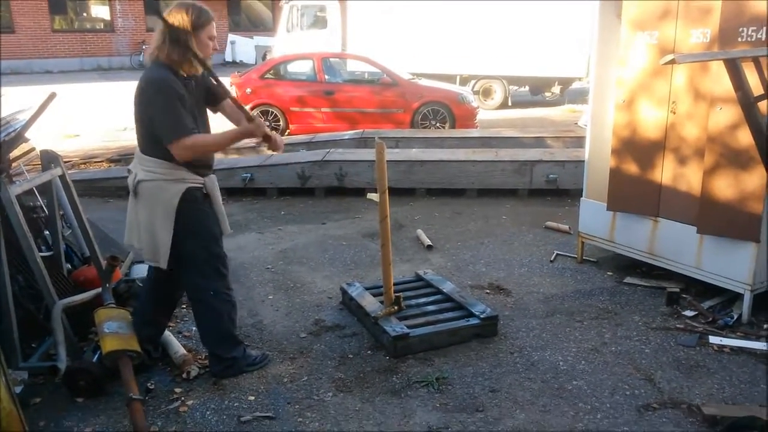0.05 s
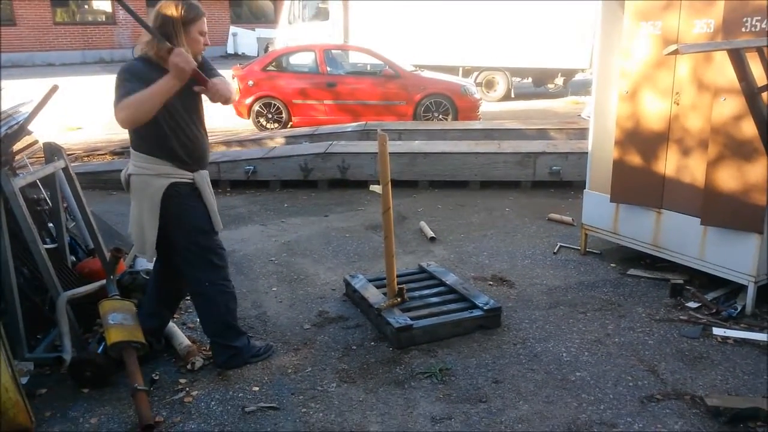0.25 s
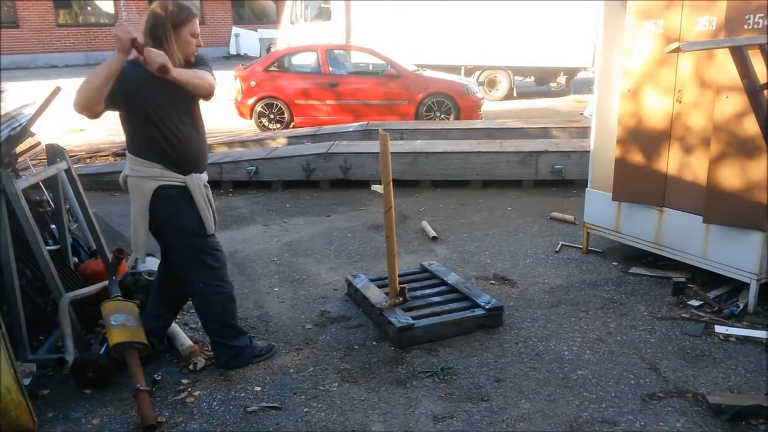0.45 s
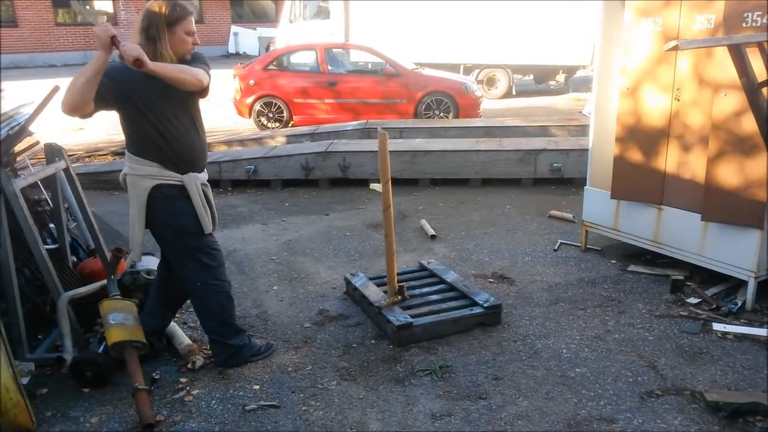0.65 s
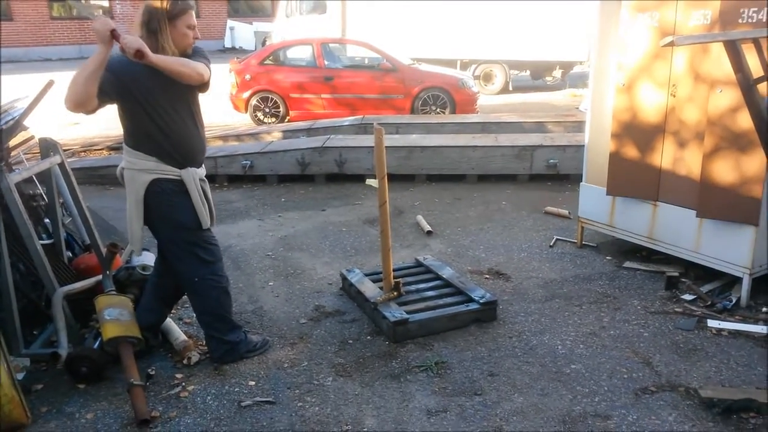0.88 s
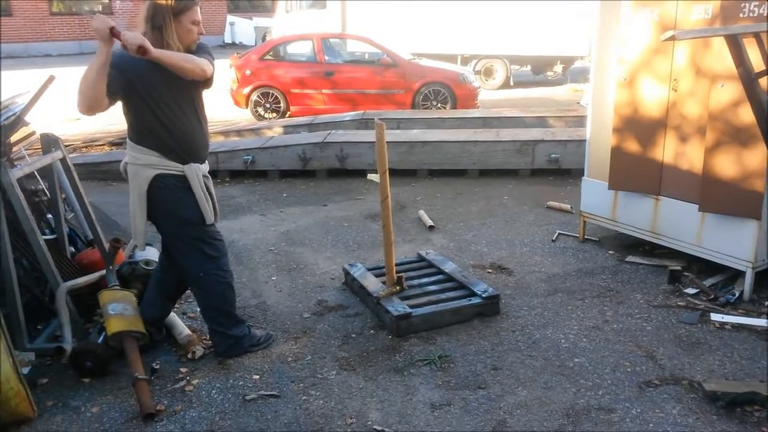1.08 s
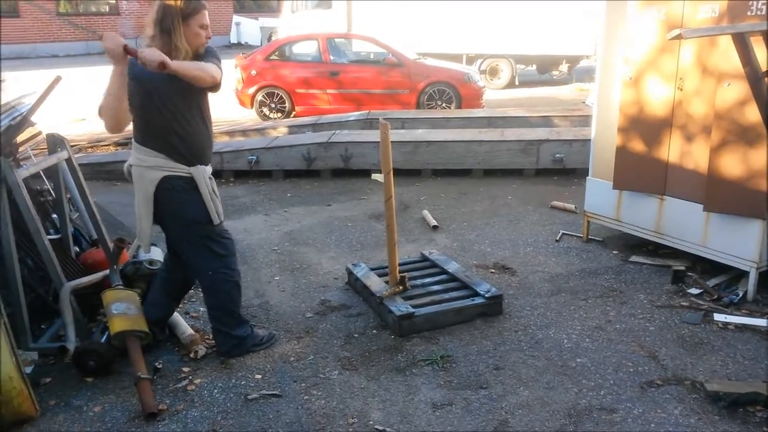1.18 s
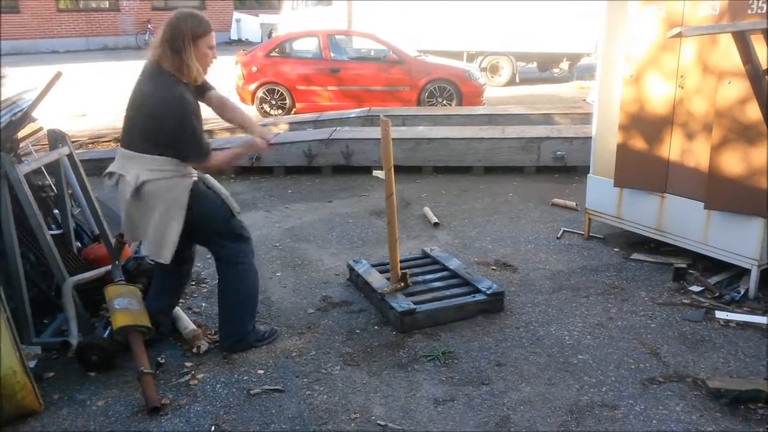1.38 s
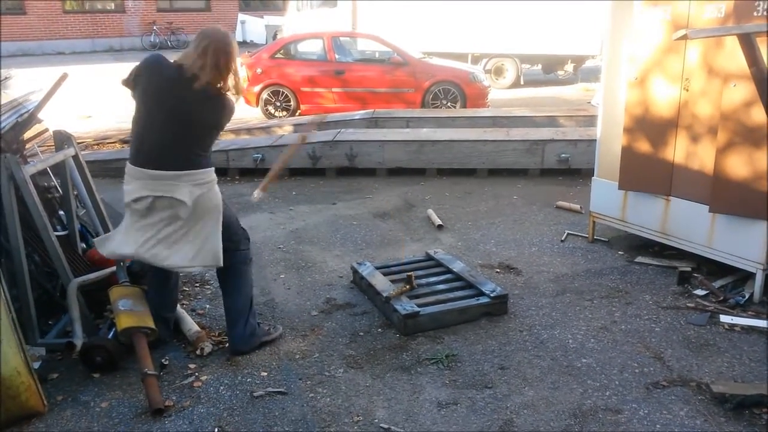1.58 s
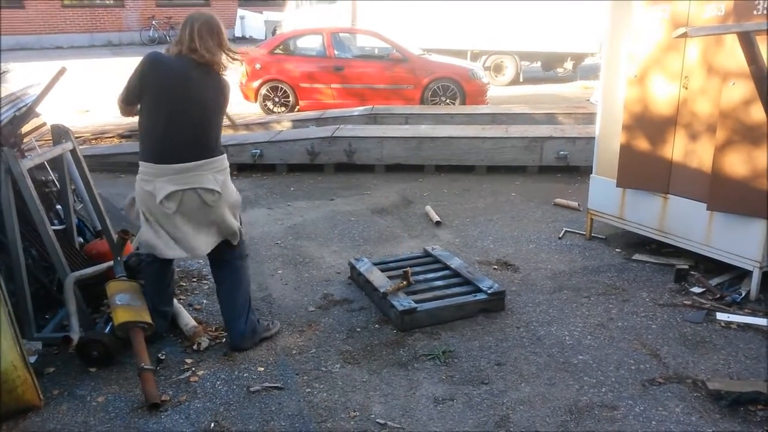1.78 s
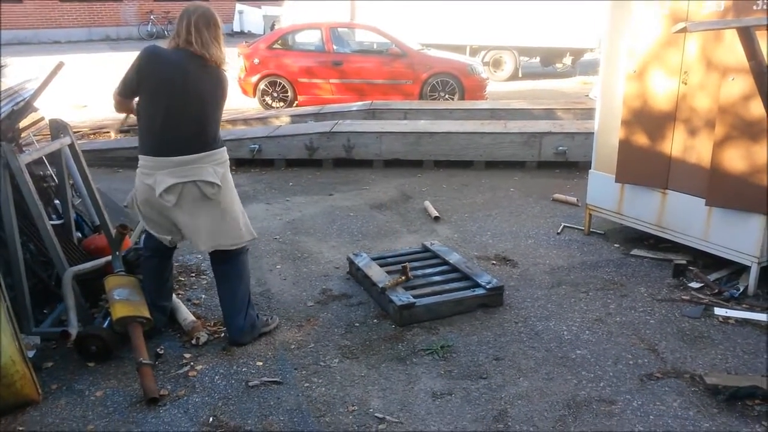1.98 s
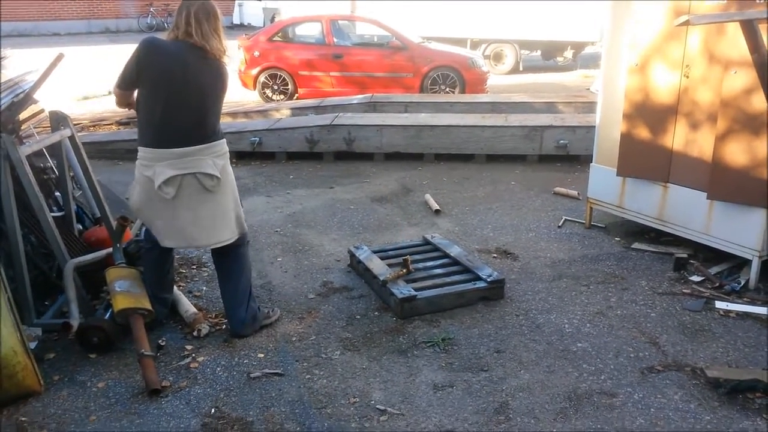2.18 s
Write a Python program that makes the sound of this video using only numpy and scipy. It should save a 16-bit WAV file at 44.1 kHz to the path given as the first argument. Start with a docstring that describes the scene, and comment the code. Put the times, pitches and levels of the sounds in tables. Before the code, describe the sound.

One loud crack of a blade chopping wood outdoors, followed by a light wooden clatter.

```python
"""A sword cuts through an upright wooden pole in a paved yard: the fibres burst in one crack,
the stump and its pallet ring, and a wall throws the crack back. Clothes rustle in the swing before it;
after it, chips tick down and the cut piece lands on grit. Under it all sit a faint electrical hum
and the wash of the town. The small microphone overloads, and its gain control ducks the yard
and recovers slowly."""
import sys
import numpy as np
from scipy import signal
from scipy.fft import rfft, irfft, next_fast_len
from scipy.io import wavfile
from scipy.ndimage import uniform_filter1d

SR = 44100
rng = np.random.default_rng(int(sys.argv[2]) if len(sys.argv) > 2 else 0)


def dump_mix(stems):
    """Bounce the given channels to the path in sys.argv[1] as a 16-bit WAV at rate SR."""
    frames = np.atleast_2d(stems).T  # one column per channel
    limited = np.clip(frames, -1, 1)  # hard clip at full scale
    pcm = np.round(limited * 32767).astype(np.int16)
    wavfile.write(sys.argv[1], SR, pcm)


N = 99048
T = np.arange(N) / SR
CUT_S = 1.6556   # the blade bites


def from_db(db):
    return 10 ** (np.asarray(db) / 20)


def unit_rms(x):
    return x / np.sqrt(np.mean(x ** 2) + 1e-20)


def fader(points):
    """Gain that rides through points of seconds and dB."""
    return from_db(np.interp(T, *np.transpose(points)))


def at_hz(points, hz):
    """Read a curve along a log frequency axis."""
    freqs, values = np.transpose(points)
    return np.interp(np.log(np.maximum(hz, 1)), np.log(freqs), values)


def drift(rate):
    """A smooth random wobble, with `rate` new values a second."""
    knots = rng.standard_normal(256)
    return np.interp(T * rate, np.arange(len(knots)), knots)


def colour(x, spectrum, keep_power=True):
    """Minimum-phase EQ, so nothing sounds ahead of an attack."""
    size = next_fast_len(N + SR // 10, real=True)
    gain = from_db(at_hz(spectrum, np.arange(size // 2 + 1) * SR / size))
    cepstrum = irfft(np.log(unit_rms(gain) if keep_power else gain), size)
    cepstrum[1:size // 2] *= 2
    cepstrum[size // 2 + 1:] = 0
    return irfft(rfft(x, size) * np.exp(rfft(cepstrum)), size)[..., :N]


def grains(per_s, spread_db):
    """Two streams of random clicks of uneven size, at unit rms."""
    sizes = from_db(spread_db * np.minimum(rng.exponential(1, (2, N)), 3))
    signs = rng.choice([-1, 1], (2, N))
    return unit_rms(sizes * signs * (rng.random((2, N)) < per_s / SR))


def burst(start, t60, hold=0):
    """Envelope with a hard attack, a hold and an even decay; times in seconds."""
    return (T >= start) * from_db(-60 * np.clip((T - start - hold) / t60, 0, 4))


def ring(start, hz, t60):
    """One struck mode: a dying sine."""
    return burst(start, t60) * np.sin(2 * np.pi * hz * (T - start))


# Stereo width. Each row: frequency in Hz, side level against mid in dB.
STEREO_WIDTH = [(60, -15), (170, -8.5), (300, -8), (700, -3), (1500, 2), (4000, -1.5), (12000, 2)]
def stereo(pair):
    """Two unrelated signals become left and right, alike in the bass and wide in the treble."""
    mid, side = pair[0], colour(pair[1], STEREO_WIDTH, keep_power=False)
    return np.array([mid + side, mid - side]) / np.sqrt(2)


# Hum partials, near multiples of the mains. Each row: frequency in Hz, rms level in dB.
HUM_PARTIALS = [(100, -59), (150, -57), (200, -55), (248, -77), (300, -52.5), (500, -83), (598, -66.5),
                (699, -57), (798, -61.5), (898, -63.5)]
def mains_hum():
    """An electrical hum: the partials wander together in pitch and waver separately in level."""
    pitch_wander, waver_db = 0.0034, 2.5
    clock = T + pitch_wander * np.cumsum(drift(3.77)) / SR
    hum = 0
    for hz, db in HUM_PARTIALS:
        peak = np.sqrt(2) * from_db(db + waver_db * drift(16))
        hum += peak * np.sin(2 * np.pi * (hz * clock + rng.random()))
    return hum


# Tone of the town. Each row: frequency in Hz, relative level in dB.
TOWN_EQ = [(25, -21), (60, 10), (110, 3.5), (250, 3), (450, -2.5), (800, -2.5), (1300, -10), (2000, -12.5),
           (3200, -21.5), (6000, -24), (10000, -33), (14000, -30.5)]
# Its fader ride. Each row: time in seconds, level in dB.
TOWN_FADER = [(0, -47), (.7, -46.5), (1.25, -48.5), (1.65, -48.5), (2.25, -49)]
def town_wash():
    """The town blurs into a low, nearly steady bed of noise."""
    return np.sqrt(2) * fader(TOWN_FADER) * colour(stereo(rng.standard_normal((2, N))), TOWN_EQ)


# Tone of the cloth. Each row: frequency in Hz, relative level in dB.
CLOTH_EQ = [(300, -3), (1500, -1), (3500, 1.5), (7000, -1), (10000, -5), (14000, -3.5)]
# The wind-up and the swing. Each row: time in seconds, level in dB.
CLOTH_FADER = [(0, -59), (.3, -55.5), (.6, -59.5), (.95, -63.5), (1.35, -60), (1.52, -50), (1.63, -49.5),
               (1.75, -74), (1.95, -76)]
# Cloth catches. Each row: start in seconds, level in dB.
CLOTH_SCUFFS = [(1.481, -52), (1.5244, -43), (1.5540, -51)]
def clothes_rustle():
    """Cloth rubs as the body winds up, and catches during the swing."""
    scuffs = sum(from_db(db) * burst(start, t60=0.027) for start, db in CLOTH_SCUFFS)
    rubbing = colour(stereo(grains(per_s=7000, spread_db=3.5)), CLOTH_EQ)
    return (fader(CLOTH_FADER) + scuffs) * rubbing


# Tone of the yard's reverb. Each row: frequency in Hz, gain in dB.
REVERB_EQ = [(100, -9), (200, -7), (320, -3), (700, 3), (1300, -5.5), (2500, -2), (5000, 12), (10000, -8.5),
             (14000, -7)]
# Its length. Each row: frequency in Hz, time to fall 60 dB in seconds.
REVERB_T60 = [(150, 0.41), (700, 0.26), (2500, 0.24), (10000, 0.25)]
def yard_reverb(x):
    """Scattered reflections build up and die band by band, over a faint far tail."""
    build_s, return_db = 0.0098, -4.5
    noise = stereo(rng.standard_normal((2, N)))
    far_tail = from_db(-20.5) * burst(0, t60=0.8)
    edges_hz = [20, 350, 1400, 5600, 18000]
    response = 0
    for low, high in zip(edges_hz, edges_hz[1:]):
        band = signal.sosfilt(signal.butter(2, [low, high], "band", fs=SR, output="sos"), noise)
        near_tail = burst(0, t60=at_hz(REVERB_T60, np.sqrt(low * high)))
        response += band * (near_tail + far_tail)
    response = unit_rms(response * (1 - np.exp(-T / build_s))) / np.sqrt(N)
    wet = signal.fftconvolve(x, response, axes=-1)[:, :N]
    return from_db(return_db) * colour(wet, REVERB_EQ, keep_power=False)


def wall_slap(x):
    """A wall throws back one echo, thin in the bass."""
    delay_s, low_cut_hz = 0.040, 900
    delayed = np.roll(x, int(delay_s * SR), axis=-1) + 1e-18
    low_cut = signal.butter(1, low_cut_hz, "high", fs=SR, output="sos")
    return from_db(-8) * signal.sosfilt(low_cut, delayed)


# Falling chips. Each row: start in seconds, level in dB.
CHIP_HITS = [(1.7900, -12.5), (1.827, -15), (1.8539, -15.5), (1.86, -19), (1.8779, -10), (1.8848, -18.5),
             (1.8927, -13.5)]
# Their tone. Each row: frequency in Hz, relative level in dB.
CHIP_EQ = [(300, -15), (1500, 0.5), (3000, -9), (5000, 4.5), (7000, -5), (13000, -22)]
def chips():
    """Chips tick down close by on the left, each with a faint rattle."""
    ticks = np.zeros((2, N))
    for start, db in CHIP_HITS:
        click = np.arange(N) == int(start * SR)
        rattle = from_db(-22.5) * burst(start, t60=0.021) * rng.standard_normal((2, N))
        ticks += from_db(db) * (click + rattle)
    pan_left = from_db([[3], [-3]])
    return colour(ticks, CHIP_EQ) * pan_left


# Dull thuds. Each row: start in seconds, puff level in dB, tone level in dB, pitch in Hz,
# tone's t60 in seconds.
THUD_HITS = [(1.7880, -23.5, -22, 175, 0.063), (2.0947, -28.5, -28, 198, 0.12),
             (2.1100, -46, -28.5, 255, .1), (2.184, -29, -24, 276, 0.088)]
# Colour of the puff. Each row: frequency in Hz, relative level in dB.
PUFF_EQ = [(50, -19.5), (130, 0.5), (350, 0), (700, -1.5), (1100, -18.5), (2500, -19), (6000, -34.5)]
def thuds():
    """The pallet settles and the piece comes down: each contact is a dull puff and a short low tone."""
    envelope = sum(from_db(db) * burst(start, t60=0.14) for start, db, *_ in THUD_HITS)
    puffs = colour(stereo(envelope * rng.standard_normal((2, N))), PUFF_EQ)
    tones = sum(from_db(db) * ring(start, hz, t60) for start, _, db, hz, t60 in THUD_HITS)
    return puffs + tones


# Ground contacts. Each row: start in seconds, clatter level in dB, grit level in dB, t60 in seconds.
LANDING_HITS = [(2.093, -30, -41.5, 0.076), (2.1812, -29, -23, 0.068), (2.2259, -33, -63, 0.24)]
# Tone of the wood and of the grit. Each row: frequency in Hz, relative level in dB.
WOOD_EQ = [(100, -10), (300, 5), (900, 5.5), (1400, -5), (2400, 1), (3500, -13.5), (4700, -10.5),
           (7000, -18.5), (13000, -20)]
GRIT_EQ = [(500, -13), (4000, -8.5), (8000, -9), (11000, -2.5), (12500, -4.5), (14500, -4)]
def piece_landing():
    """The cut piece lands and skids: each contact is a woody clatter and a crunch of grit."""
    wood_level = grit_level = 0
    for start, wood_db, grit_db, t60 in LANDING_HITS:
        contact = burst(start, t60, hold=0.0065)
        wood_level += from_db(wood_db) * contact
        grit_level += from_db(grit_db) * contact
    clatter = stereo(wood_level * grains(per_s=2700, spread_db=3))
    crunch = stereo(grit_level * grains(per_s=4900, spread_db=10.5))
    return colour(clatter, WOOD_EQ) + colour(crunch, GRIT_EQ)


# Modes of the pole and its pallet. Each row: frequency in Hz, relative level in dB, t60 in seconds.
POLE_MODES = [(175, -13, 0.26), (204.4, 1.5, 0.28), (225, -6, 0.4), (385, -11, .2), (419.2, -6.5, .2),
              (547, -4, 0.098), (604, -6.5, 0.22), (654, -9.5, 0.28), (746, -5.5, 0.11), (858, -13.5, 0.2),
              (1466, -11.5, 0.06), (1665, -7.5, .06), (2209, -13, 0.083)]
def pole_ring():
    """The blow sets the stump and its pallet ringing, the modes alternating in polarity."""
    start = CUT_S + 0.003
    modes = sum((-1) ** k * from_db(db) * ring(start, hz, t60)
                for k, (hz, db, t60) in enumerate(POLE_MODES))
    return from_db(-3.5) * modes


# Tone of the crack. Each row: frequency in Hz, relative level in dB.
CRACK_EQ = [(60, -16.5), (130, -14.5), (220, 2), (700, 5.5), (1150, -3), (2000, -1), (3200, -11.5),
            (5000, -12.5), (8000, -16), (10500, -12.5), (14000, -21)]
def fibre_crack():
    """The fibres burst within a few milliseconds; the last ones splinter after them."""
    snaps = from_db(2) * grains(per_s=9000, spread_db=5) * burst(CUT_S, t60=0.016, hold=0.0053)
    splinters = from_db(-3.5) * grains(per_s=770, spread_db=-3.5) * burst(CUT_S, t60=0.2)
    return colour(stereo(snaps + splinters), CRACK_EQ)


def scene():
    """The crack and the landing echo in the yard; everything else stays dry."""
    crack, landing = fibre_crack(), piece_landing()
    send = crack + from_db(-6) * landing
    echoes = yard_reverb(send) + wall_slap(send)
    action = crack + landing + pole_ring() + thuds() + chips() + clothes_rustle()
    return action + echoes + mains_hum() + town_wash()


# Microphone port resonances, a list for left and one for right. Each row: centre in Hz, gain in dB, Q.
MIC_PORTS = [
    [(4720, 10, 6.45), (5100, 10.5, 4.64), (2200, 4, 5.8), (10100, -2.5, 1.8)],
    [(10310, 13.5, 2.52), (8600, 3, 3.2), (3000, 0.5, 1.5)],
]
def mic_port(x, resonances):
    """The port of a small microphone colours the treble like a chain of bell EQs."""
    for hz, db, q in resonances:
        angle, gain = 2 * np.pi * hz / SR, from_db(db / 2)
        width, centre = np.sin(angle) / (2 * q), -2 * np.cos(angle)
        x = signal.lfilter([1 + width * gain, centre, 1 - width * gain],
                           [1 + width / gain, centre, 1 - width / gain], x)
    return x


def gain_control(x):
    """Ducks quickly when the level passes the threshold, then creeps back up."""
    threshold_db, attack_s, release_db_per_s = -5.5, 0.004, 1
    power = uniform_filter1d(np.mean(x ** 2, axis=0), size=256)
    over_db = np.maximum(10 * np.log10(np.maximum(power, 1e-12)) - threshold_db, 0)
    release_db = release_db_per_s * T
    duck_db = np.maximum.accumulate(over_db + release_db) - release_db
    lag = np.exp(-1 / (attack_s * SR))
    return x * from_db(-signal.lfilter([1 - lag], [1, -lag], duck_db))


def record(dry):
    """The small microphone: port resonances, gain control, overload and a steep top cut."""
    ceiling, top_cut_hz = 0.88, 15100
    coloured = np.array([mic_port(channel, port) for channel, port in zip(dry, MIC_PORTS)])
    clipped = np.clip(gain_control(coloured), -ceiling, ceiling)
    return signal.sosfilt(signal.cheby2(16, 60, top_cut_hz, fs=SR, output="sos"), clipped)


dry = scene()
out = record(dry)
dump_mix(out)
```